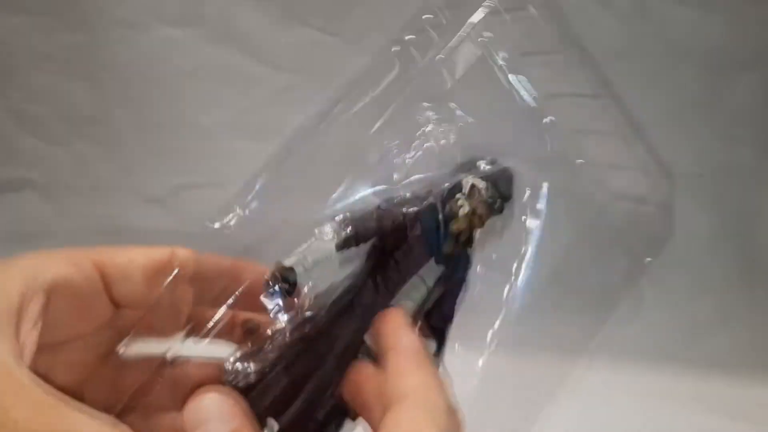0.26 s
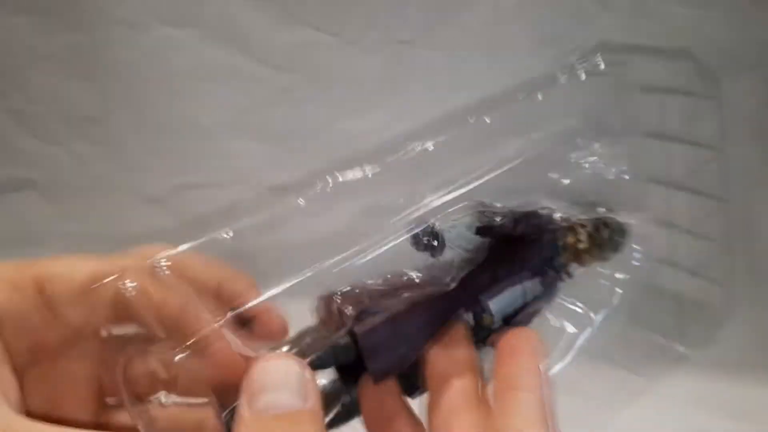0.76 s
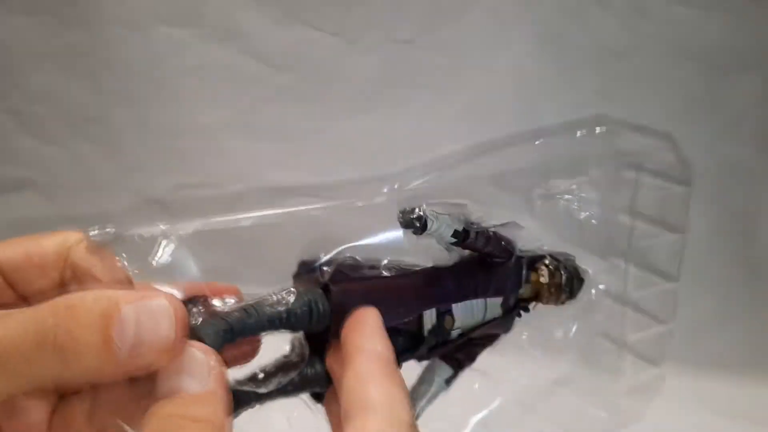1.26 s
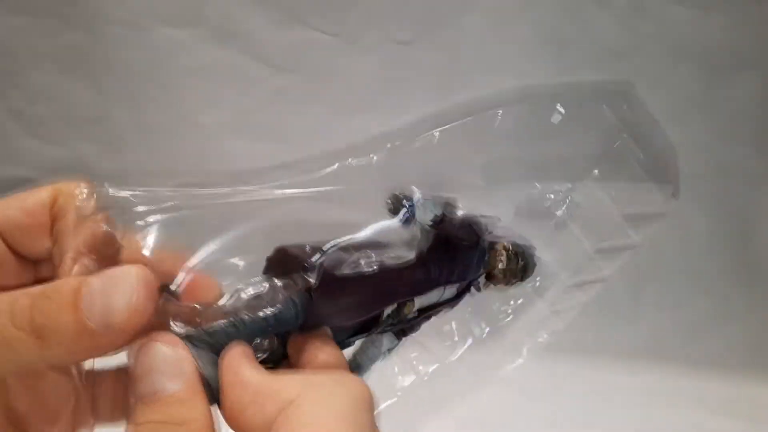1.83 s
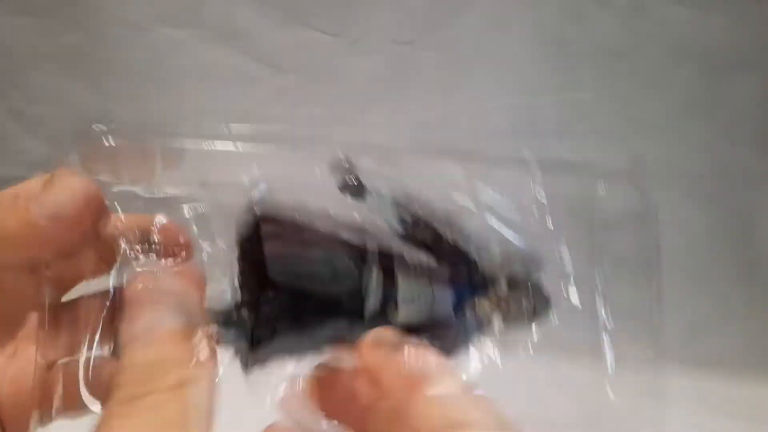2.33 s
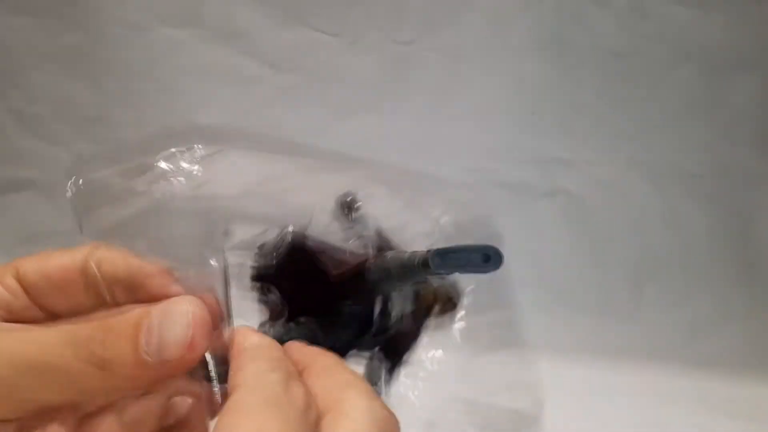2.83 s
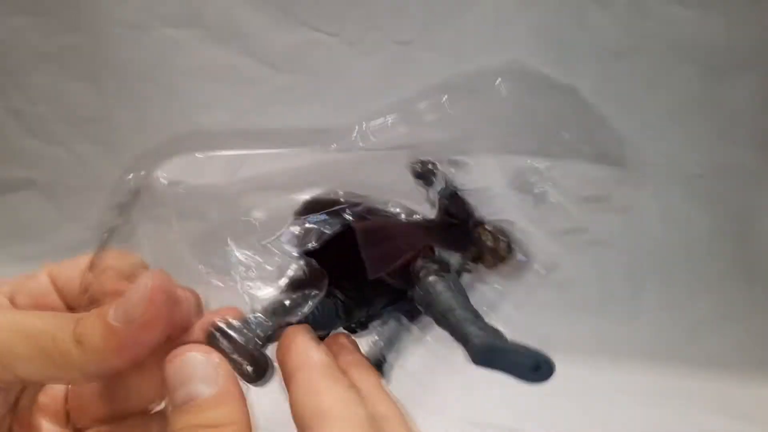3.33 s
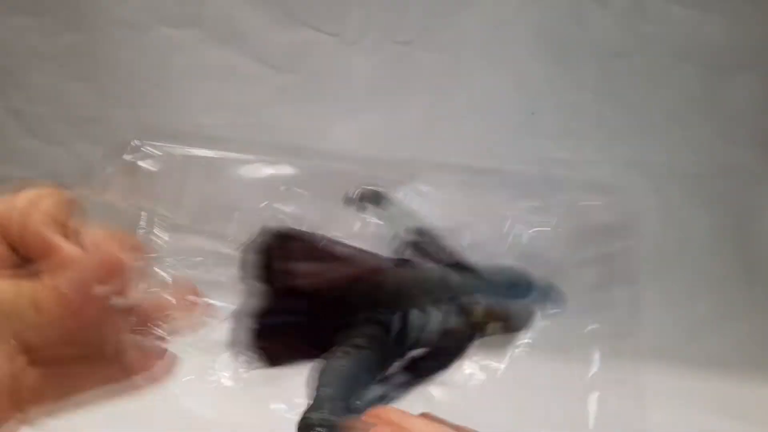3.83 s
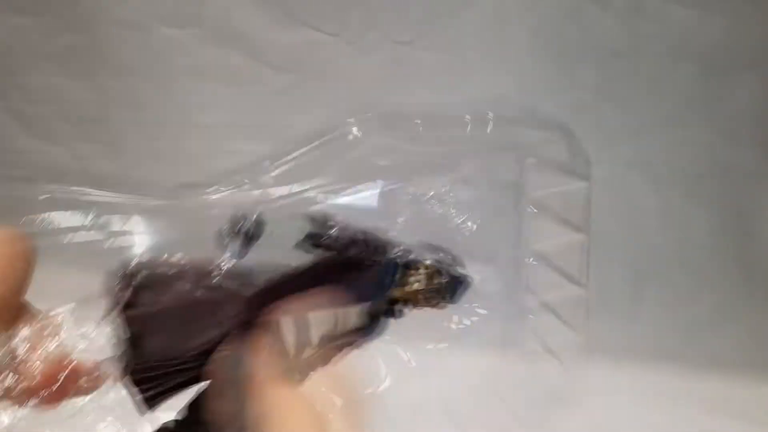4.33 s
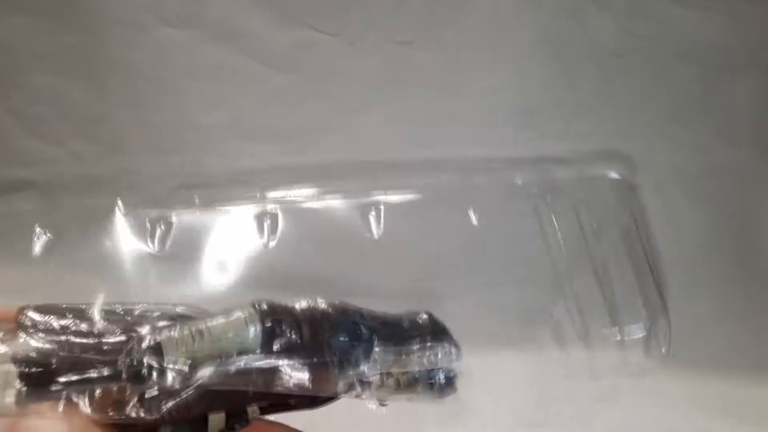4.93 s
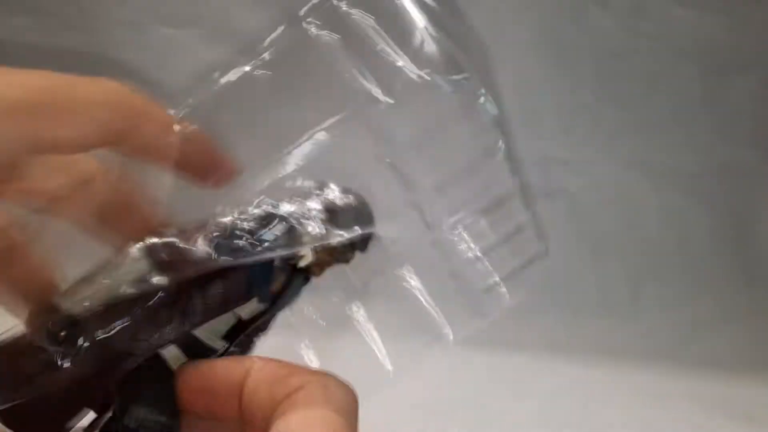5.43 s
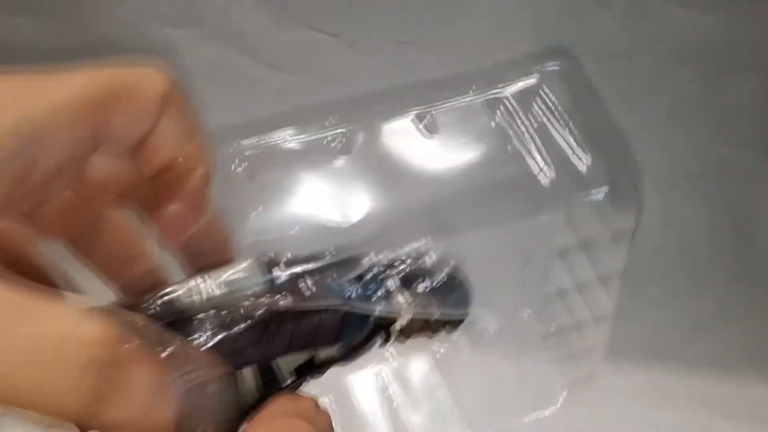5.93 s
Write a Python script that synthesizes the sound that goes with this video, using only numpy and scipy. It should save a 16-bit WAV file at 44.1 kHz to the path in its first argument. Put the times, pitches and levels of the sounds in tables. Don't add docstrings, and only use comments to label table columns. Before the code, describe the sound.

Close stereo sound in a small, dry, quiet room with barely audible room tone. At 0 s a thin stiff plastic tray buckles with loud bright snaps and a hollow knock, falling by 0.1 s to lighter pops, rubbing and crinkle until about 1 s. From 1.1 s ticks build into a dense burst at 1.25-1.5 s, with sharp cracks, short plastic pings and a low thump; another cluster hits at 1.8-2.0 s, then strong snaps at 2.25-2.4 s. From 2.5 to 3.05 s only faint ticks. Pressing brings heavy pops at 3.1-3.3 s, mixed snaps and a scrape near 3.5 s, more at 3.7-3.95 s. After a short hush, crisp snaps strike at 4.23-4.26 s and 4.48-4.53 s. Then it thins to small crackles and soft rubbing, a very quiet gap near 5.35 s, a moderate pop at 5.72 s and light crinkles to about 6.15 s.

```python
import sys
import numpy as np
from scipy import signal
from scipy.fft import rfft, irfft
from scipy.io import wavfile
from scipy.ndimage import uniform_filter1d

SR = 44100
rng = np.random.default_rng(int(sys.argv[2]) if len(sys.argv) > 2 else 0)


def voltage_ratio(level):
    return 10 ** (np.asarray(level, float) / 20)


def dump_mix(stems):
    frames = np.atleast_2d(stems).T
    limited = np.clip(frames, -1, 1)
    pcm = np.round(limited * 32767).astype(np.int16)
    wavfile.write(sys.argv[1], SR, pcm)


N = 272097

# start in seconds [s], knock level [dB].
POPS_LEGS = [(0.03, -10.5), (0.036, -37), (0.071, -26), (0.098, -19.5), (0.337, -15), (0.431, -19.5),
             (0.906, -26), (1.122, -20.5), (1.229, -22), (1.309, -31), (1.415, -12.5), (1.445, -16.5),
             (1.945, -20.5), (2.146, -23.5), (2.202, -17.5), (2.234, -32.5), (2.304, -20.5), (2.412, -33),
             (2.735, -31.5), (2.921, -37), (3.015, -34.5)]
# start in seconds [s], knock level [dB].
POPS_BODY = [(3.231, -7), (3.468, -16.5), (3.545, -30), (3.684, -25.5), (3.735, -17), (3.822, -21),
             (3.843, -15.5), (3.975, -26.5), (4.259, -28), (4.482, -16), (4.534, -13.5), (4.796, -28),
             (4.953, -27), (5.465, -28), (5.72, -23.5), (5.791, -20.5), (5.873, -51), (5.89, -50)]
LEFT_LEAD_S = 0.00017
MIDDLE_HZ = 1400


def evened(x):
    return x / np.sqrt(np.mean(x ** 2) + 1e-20)


def read(points, hz):
    f, value = np.transpose(points)
    return np.interp(np.log(hz + 1), np.log(f + 1), value)


def add(mix, s, sound):
    part = mix[:, round(s * SR):][:, :sound.shape[1]]
    part += sound[:, :part.shape[1]]


def band(x, lo_hz, hi_hz):
    return signal.sosfilt(signal.butter(N=2, Wn=[lo_hz, hi_hz], btype="band", fs=SR, output="sos"), x)


def ports(db):
    return voltage_ratio(np.array([[db], [-db]]))


def hush():
    # frequency [Hz], level [dB per Hz].
    tone = [(18, -25.5), (30, 10.5), (204, -6), (280, 11), (540, -28), (1590, -6.5), (2830, -43),
            (16000, -41)]
    white = rfft(rng.standard_normal((2, N)))
    shaped = white * voltage_ratio(read(tone, np.fft.rfftfreq(N, 1 / SR)))
    return voltage_ratio(-65.5) * evened(irfft(shaped, N))


def room(x):
    # frequency [Hz], decay time t60 [s].
    decay = [(200, 0.14), (2000, 0.12), (14000, 0.047)]
    taps = np.zeros((2, SR // 2))
    at = np.arange(200, SR // 2 - 20, 20) + rng.integers(0, 20, (2, 1))
    at = at + rng.integers(-9, 9, at.shape)
    np.put_along_axis(taps, at, rng.choice([-1., 1.], at.shape), 1)
    hz, t, z = signal.stft(taps, SR, nperseg=256)
    fade = voltage_ratio(-60 * t / read(decay, hz)[:, None])
    tail = signal.istft(z * fade, SR, nperseg=256)[1]
    return signal.fftconvolve(x, tail / np.linalg.norm(tail[0]), axes=1)[:, :N]


def spread(lo_hz, hi_hz, count=72):
    return lo_hz * (hi_hz / lo_hz) ** ((np.arange(count) + rng.random(count)) / count)


def patch(hz, db, tear_s, top_hz, count=72):
    # frequency [Hz], decay time t60 [s].
    sheet_decay = [(600, 0.054), (1500, 0.021), (4000, 0.014), (9000, 0.011), (16000, 0.0028)]
    # frequency [Hz], level [dB].
    radiation = [(600, -6.5), (800, -3), (2000, -4), (6000, 14), (9500, 14.5), (12500, 20.5), (16000, 20)]
    luck = rng.random((5, count))
    t = np.arange(2200) / SR
    t60 = read(sheet_decay, hz) * (0.83 + 0.59 * luck[0])
    modes = np.exp((2j * np.pi * hz - np.log(1000) / t60)[:, None] * t)

    lag = np.minimum(hz / 4500, 1) * (luck[3] - .5) - hz * LEFT_LEAD_S * (.5 + luck[0, 0])
    turn = luck[2] + np.array([0 * hz, lag])
    port_db = 3.9 * np.outer([1, -1], luck[4] - .5)
    size = voltage_ratio(db + read(radiation, hz) + 6.1 * (luck[1] - .5) + port_db)
    ringing = ((size * np.exp(2j * np.pi * turn)) @ modes).imag

    tear = rng.standard_normal(400) * np.exp(-(t[:400] / tear_s) ** 2)
    colour = rfft(tear)
    tear = irfft(colour / abs(colour) ** 0.45, len(tear))
    tear = tear * np.exp(-(t[:len(tear)] / tear_s) ** 2 / 2)
    out = signal.fftconvolve(ringing, tear[None], axes=1)
    out = band(out, 290, top_hz)
    return out / abs(out).max()


def dent(pitch_hz):
    # centre [Hz], width [octaves], level [dB].
    colouring = [(626, 0.13, -12.5), (876, 0.16, 3), (1052, 0.15, -4.5), (1750, 0.36, 4.5), (7700, 0.87, -5)]
    hz = spread(602.0, 7994)
    octaves = np.log2(hz / pitch_hz)
    colour_db = sum(db * np.exp(-(np.log2(hz / f) / wide) ** 2) for f, wide, db in colouring)
    slope_db = np.where(octaves > 0, 12.5, 8.0) * abs(octaves)
    return patch(hz, colour_db - slope_db, .001 + 1.2 / pitch_hz, min(3.5 * pitch_hz, SR / 2.2))


def crack():
    return patch(spread(5594, 15800), 0., 0.0016, SR / 2.2)


def knock():
    # mode frequency [Hz], level [dB], decay time t60 [s].
    tray = [(186.9, -15.5, 0.35), (277, -28, 0.14), (290.8, -7.5, 0.32), (320.9, 1.5, 0.17),
            (356.7, 8.5, 0.062), (427, 3.5, 0.053), (492.6, -2, 0.089)]
    t = np.arange(6000) / SR
    hz, db, t60 = np.transpose(tray)[:, :, None]
    bend, place = rng.standard_normal((2, len(tray), 1))
    fade = voltage_ratio(db + 2.5 * place - 60 * t / t60)
    ring = (fade * np.sin(2 * np.pi * hz * (1 + 0.04 * bend) * t)).sum(0)
    ring = band(ring * (1 - np.exp(-t / 0.0012)), 170, 990)
    return ring / abs(ring).max() * ports(.8)


def sparks(per_s, spread_db):
    return voltage_ratio(spread_db * np.minimum(rng.exponential(1, N), 4)) * (rng.random(N) < per_s / SR)


def crackle(shapes, per_s, spread_db):
    out = 0
    for shape in shapes:
        train = sparks(per_s / len(shapes), spread_db)
        out = out + signal.oaconvolve(train[None], shape, axes=1)[:, :N]
    return evened(out)


def stir(rows, column):
    strain_db, strain_s, settle_s = -15, 0.02, 0.024
    t = np.arange(0, N + 256, 256) / SR
    since = t - np.array([r[0] for r in rows])[:, None]
    before = voltage_ratio(strain_db) * np.exp(-abs(since) / strain_s)
    shape = np.where(since < 0, before, np.exp(-abs(since) / settle_s))
    power = voltage_ratio([r[column] for r in rows]) ** 2 @ shape
    return np.interp(np.arange(N) / SR, t, power)


def control(column, hand_db, unrest, unrest_db):
    # time in seconds [s], grip pressure [dB], finger slide [dB].
    grip = [(0, -45.5, -48), (.45, -55.5, -57.5), (.8, -51.5, -63), (1.3, -67, -53), (1.7, -55, -64.5),
            (2.3, -59.5, -65.5), (2.75, -63, -71), (3.3, -50, -48), (3.6, -72, -61), (3.947, -47, -42),
            (4.301, -78.5, -101.5), (4.751, -76, -69.5), (5.2, -55, -67), (5.5, -50, -62.5),
            (5.85, -47.5, -53.5), (6.15, -55.5, -60.5)]
    # middle in seconds [s], length [s], depth [dB].
    pauses = [
        (1.06, 0.17, -8.5),
        (2.52, 0.08, -11.5),
        (2.996, 0.16, -12.5),
        (3.44, 0.06, -7.5),
        (4.131, 0.066, -21),
        (4.426, 0.021, -3),
        (5.354, 0.18, -21.5),
        (5.637, 0.12, -11.5),
    ]
    rows, t = np.array(grip), np.arange(N) / SR
    hands = voltage_ratio(hand_db + np.interp(t, rows[:, 0], rows[:, column]))
    still_db = sum(db * np.exp(-(2 * (t - s) / long_s) ** 4) for s, long_s, db in pauses)
    return np.sqrt(hands ** 2 + voltage_ratio(unrest_db) ** 2 * unrest) * voltage_ratio(still_db)


def handling():
    # time in seconds [s], level [dB].
    bumps = [
        (1.42, -24),
        (3.1, -30.5),
        (3.79, -29.5),
        (4.5, -27.5),
    ]
    dull = crackle([dent(hz) for hz in spread(750, 2600, count=8)], 900, 3.8)
    fine = crackle([crack() + 1.15 * dent(hz) for hz in spread(2600, 6900, count=16)], 1600, 3.2)
    clumps = evened(uniform_filter1d(rng.standard_normal(N), size=900))
    fine = evened(fine * voltage_ratio(5.5 * clumps))
    creak = crackle([knock() for _ in range(6)], 90, 2.85)
    lumps = rng.standard_normal((3, N))
    thump = lumps[:2] * 0.32 + lumps[2]
    thump = evened(band(band(thump, 62, 208), 43, 210))

    bent, creased = stir(dents(), column=1), stir(dents(), column=3)
    popped = stir(POPS_LEGS + POPS_BODY, column=1)
    bumped = popped + voltage_ratio(43.5) * stir(bumps, column=1)
    rub = control(2, 5.5, bent, -37.5) * dull
    rub = rub + control(2, -0.18, creased, -25.0) * fine
    rub = rub + control(1, -1.7, bumped, -31.5) * thump
    return ports(1.3) * rub + control(1, 3.1, popped, -16.0) * creak


def rings(rows, t60, trim_db):
    out, t = np.zeros((2, N)), np.arange(6000) / SR
    late = t - np.array([[0], [LEFT_LEAD_S]])
    for s, db, hz in rows:
        pair = np.sin(2 * np.pi * hz * late) + 0.27 * np.sin(2 * np.pi * hz * 1.09 * late + 0.39)
        fade = voltage_ratio(db + trim_db - 60 * t / t60) * (1 - np.exp(-t / 0.00089))
        add(out, s, ports(1.4) * fade * pair)
    return out


def thuds():
    # start in seconds [s], level [dB], pitch [Hz].
    heel = [
        (0.198, -34, 113),
        (1.413, -29.5, 112),
        (1.938, -37.5, 140),
        (3.111, -27.5, 166),
        (3.788, -33, 60),
        (4.768, -42, 134.4),
        (5.779, -35.5, 161),
    ]
    return band(rings(heel, .16, -1.8), 35, 170)


def panels():
    # start in seconds [s], level [dB], pitch [Hz].
    low = [(0.019, -20, 940), (0.059, -9, 980), (0.231, -24.5, 837), (0.43, -22, 870), (0.62, -21.5, 870),
           (1.123, -22, 807), (1.232, -23.5, 770), (1.315, -22, 750), (1.414, -6.5, 690), (1.458, -27, 730),
           (1.485, -15, 767), (1.812, -22.5, 1284), (1.855, -35, 860), (1.922, -27.5, 1190),
           (1.945, -17.5, 1350), (1.972, -16, 650), (2.204, -31, 845), (2.261, -16, 765),
           (2.304, -19.5, 750), (2.375, -9.5, 940), (2.434, -29, 1134), (2.47, -29.5, 963),
           (2.554, -33.5, 984), (2.846, -28.5, 837), (3.081, -18, 956), (3.101, -19.5, 806),
           (3.159, -20, 940), (3.22, -10.5, 810), (3.286, -9.5, 884), (3.472, -11.5, 1113),
           (3.689, -22.5, 700), (3.767, -19, 810), (3.819, -21, 925), (3.915, -8, 1190),
           (4.243, -24.5, 860), (4.257, -13.5, 1140), (4.304, -28, 945), (4.338, -25, 670),
           (4.482, -10, 780), (4.517, -7.5, 1170), (4.868, -25, 1195), (4.916, -29, 1260),
           (6.118, -28.5, 767)]
    # start in seconds [s], level [dB], pitch [Hz].
    high = [(0.058, -23, 1450), (0.2075, -28, 1660), (0.4296, -19, 1730), (0.9662, -22, 1910),
            (1.2573, -11.5, 4420), (1.3493, -10, 4330), (1.3515, -2.5, 1870), (1.3743, 1.5, 1785),
            (1.484, -5.5, 1810), (1.7277, -19, 1810), (1.8128, -2.5, 1667), (1.925, -17, 1550),
            (1.947, 2, 2100), (2.0762, -24, 4450), (2.2618, -5, 2100), (2.304, -17, 1590),
            (2.359, -23.5, 1750), (2.3695, 3, 2180), (2.5547, -24.5, 1620), (2.6315, -24, 1395),
            (3.1068, -17.5, 1420), (3.2224, -8.5, 1650), (3.2874, -20.5, 1720), (3.475, -25, 1364),
            (3.4735, -0.5, 2000), (3.5813, -16, 4320), (3.6855, -28.5, 2020), (3.7494, -29, 2080),
            (3.7674, -8.5, 1570), (3.8176, -31, 1480), (3.9125, -6, 2300), (4.213, -35.5, 3670),
            (4.2298, 2, 3150), (4.2564, -25, 1660), (4.4453, -26.5, 1400), (4.4802, 3, 2110),
            (4.5155, -20.5, 1730), (4.953, -19, 1420), (5.72, -16, 1967), (6.116, -17.5, 2270)]
    return rings(low, 0.031, -2.5) + rings(high, 0.015, -3.0)


def slips():
    # start in seconds [s], dent level [dB], patch pitch [Hz], crease tick level [dB].
    small_dents = [(0.2404, -32.5, 1380, -47), (0.2734, -28, 1360, -51), (0.3864, -35, 1470, -43),
                   (0.4074, -26, 1530, -34), (0.5087, -35, 1490, -52), (0.7344, -27, 1820, -35),
                   (0.8804, -33.5, 1390, -41), (1.3484, -20, 1860, -15), (1.4074, -13, 1610, -28),
                   (1.4514, -20, 1310, -28), (1.5224, -33, 1740, -33.5), (2.0874, -33, 2150, -54),
                   (2.1804, -23.5, 2060, -43), (2.5854, -42, 1630, -60), (2.8124, -32, 3770, -32),
                   (2.9452, -40, 3260, -52.5), (3.0624, -37, 4080, -34), (3.0714, -35, 1320, -21.5),
                   (3.5264, -45, 3740, -33.5), (3.6364, -29, 1500, -49), (3.7344, -37, 1340, -46),
                   (3.8344, -14, 1980, -31), (3.9364, -34, 1664, -26), (4.1994, -37.5, 3410, -49),
                   (4.3844, -33, 1350, -60), (4.7424, -44, 1720, -59), (5.7004, -38, 1900, -55),
                   (5.891, -36, 1390, -44), (5.9938, -41, 1400, -53), (6.0904, -40, 1280, -54),
                   (1.139, -33, 4500, -43), (1.217, -27, 4050, -33), (1.234, -28, 3500, -24),
                   (4.294, -31, 3510, -37), (4.442, -36, 3470, -37), (5.908, -46, 4490, -36),
                   (1.74, -39, 4000, -40), (1.785, -50, 4000, -50), (1.871, -33, 3500, -33),
                   (3.179, -39, 4480, -30.5)]
    out = np.zeros((2, N))
    for s, dent_db, pitch_hz, crack_db in small_dents:
        add(out, s - .0005, voltage_ratio(dent_db - 3.5) * dent(pitch_hz) + voltage_ratio(crack_db + 2.5) * crack())
    return out * ports(1.4)


def scrapes():
    # start in seconds [s], length [s], dent level [dB], patch pitch [Hz].
    slides = [(0, 0.01, -62.5, 1610), (0.33, 0.034, -30.5, 1060), (0.543, 0.029, -44, 1680),
              (0.608, 0.06, -39.5, 1280), (0.713, 0.082, -43, 1570), (1.304, 0.013, -32, 953),
              (1.344, 0.0068, -41, 2266), (1.403, .022, -29, 1190), (1.889, 0.089, -38.5, 1770),
              (2.341, 0.054, -27, 1505), (3.055, 0.049, -35, 1565), (3.093, 0.026, -25.5, 1220),
              (3.459, 0.0355, -24, 875), (3.684, 0.018, -31, 1390), (4.436, 0.029, -37.5, 1583),
              (4.532, 0.045, -35, 1290), (5.138, .085, -51, 1260), (5.392, 0.079, -58.5, 1580),
              (5.446, 0.077, -49.5, 1060), (5.529, 0.045, -47.5, 1760)]
    out = np.zeros((2, N))
    for s, long_s, dent_db, pitch_hz in slides:
        octaves = np.log2(pitch_hz / MIDDLE_HZ)
        knock_db = dent_db - 2.5 - 14 * octaves
        crack_db = dent_db - 10.5 + 25 * octaves
        swell = signal.windows.tukey(round(long_s * SR), .6)
        long = len(swell)
        parts = [(dent_db, dent(pitch_hz * .8)), (dent_db, dent(pitch_hz * 1.3)),
                 (crack_db, crack()), (knock_db, knock())]
        for db, shape in parts:
            push = swell * rng.standard_normal(long) * (rng.random(long) < .03)
            run = signal.fftconvolve(shape, push[None], axes=1)
            add(out, s, voltage_ratio(db - 3.0) * run / np.sqrt(np.mean(run[:, :long] ** 2)))
    return out * ports(1.2)


def dents():
    # start in seconds [s], dent level [dB], patch pitch [Hz], crease
    # tick level [dB].
    large_dents = [(.001, -6, 2560, -20.5), (.018, -13, 1190, -46.5), (.031, -21, 1790, -23.5),
                   (.038, -15.5, 2630, -19), (.06, -12.5, 1580, -22.5), (.072, -8.5, 2180, -18.5),
                   (.207, -20.5, 1620, -36.5), (.231, -26, 1840, -24), (.25, -38, 2210, -39),
                   (.301, -28, 1730, -33), (.347, -26.5, 1200, -59), (.397, -29.5, 3470, -39),
                   (.431, -23.5, 1420, -55.5), (.443, -23.5, 1090, -27), (.532, -29.5, 1710, -54),
                   (.556, -29.5, 2170, -36), (.795, -24.5, 1310, -52), (.837, -39, 2030, -43.5),
                   (.89, -62, 1150, -50), (.915, -33.5, 890, -51), (.966, -30.5, 1970, -34),
                   (1.002, -39, 830, -63), (1.031, -44, 2380, -35.5),
                   (1.123, -37, 745, -64), (1.145, -33, 1840, -35), (1.185, -32.5, 2210, -30),
                 (1.203, -41, 2260, -34), (1.225, -23.5, 3060, -23.5), (1.241, -22, 2960, -24),
                 (1.258, -10.5, 2970, -17), (1.274, -27.5, 3900, -30.5), (1.342, -9.5, 6470, -19.5),
                 (1.355, -21.5, 2650, -34.5), (1.374, -9.5, 2110, -17), (1.391, -11.5, 2730, -12.5),
                 (1.416, -9, 1500, -43), (1.461, -14.5, 1500, -35.5), (1.486, -13, 1200, -30.5),
                 (1.576, -30.5, 1930, -41), (1.606, -29.5, 1860, -41.5), (1.728, -35, 1850, -61.5),
                 (1.77, -38, 1730, -72), (1.813, -14.5, 2130, -36), (1.856, -23, 1910, -28),
                 (1.924, -12, 2210, -11), (1.947, -8, 2320, -12), (1.965, -8.5, 3300, -14.5),
                 (1.975, -20.5, 1670, -41),
                   (2.077, -23, 3910, -42), (2.133, -28.5, 1720, -39), (2.147, -27.5, 1660, -42),
                  (2.204, -26, 1250, -47), (2.217, -23.5, 1600, -50), (2.225, -25.5, 1960, -37.5),
                  (2.235, -23.5, 1520, -39), (2.245, -24, 1990, -34), (2.262, -10, 2870, -13),
                  (2.304, -12.5, 2520, -21), (2.357, -25, 2080, -19.5), (2.37, -8, 2100, -30.5),
                  (2.411, -26, 3100, -24.5), (2.435, -28.5, 1800, -33.5), (2.47, -31, 1410, -70),
                  (2.554, -37, 1440, -53.5), (2.633, -33, 1345, -57), (2.733, -35.5, 1840, -42),
                  (2.77, -36, 2140, -46), (2.785, -48, 2850, -42.5), (2.802, -35.5, 3550, -34.5),
                  (2.847, -34.5, 1630, -39), (2.92, -41.5, 2080, -65.5), (2.98, -44.5, 2490, -43.5),
                  (3.012, -39.5, 1440, -49), (3.044, -37.5, 1940, -42.5),
                   (3.081, -22.5, 1160, -21.5), (3.105, -15.5, 1670, -19), (3.16, -16, 2150, -31.5),
                (3.172, -27, 2360, -45), (3.207, -30.5, 3440, -30), (3.221, -7, 2930, -14),
                (3.233, -10, 1990, -9.5), (3.287, -6, 1770, -32.5), (3.304, -22, 3520, -17.5),
                (3.399, -32, 1800, -65), (3.441, -40, 4590, -31.5), (3.474, -16, 1380, -36.5),
                (3.534, -28, 2050, -24.5), (3.545, -27, 3580, -31), (3.559, -28, 1660, -54),
                (3.581, -19.5, 4600, -33.5), (3.595, -28, 4770, -26), (3.653, -26.5, 1800, -28.5),
                (3.684, -18.5, 1880, -32.5), (3.748, -26, 1520, -65), (3.77, -15, 2050, -16.5),
                (3.779, -16, 1950, -19), (3.789, -13, 3400, -16.5), (3.818, -12.5, 1380, -37),
                (3.843, -21, 2190, -19), (3.915, -9, 1860, -27.5), (3.922, -6, 2150, -23),
                (3.989, -51, 1320, -47), (4.013, -32.5, 2600, -30), (4.024, -21.5, 1750, -32.5),
                   (4.045, -34, 2980, -49.5), (4.076, -33.5, 2160, -41), (4.153, -39, 2020, -35),
               (4.214, -46, 3250, -39.5), (4.23, -8, 3750, -19.5), (4.258, -7.5, 1400, -29),
               (4.304, -26, 1610, -29.5), (4.338, -30, 1030, -36.5), (4.354, -29.5, 1670, -38),
               (4.455, -26, 2020, -25.5), (4.474, -17.5, 3270, -24), (4.483, -7, 1500, -21),
               (4.516, -7, 2110, -22.5), (4.527, -12, 3300, -28), (4.532, -12, 1470, -15),
               (4.667, -36, 3870, -38.5), (4.758, -33.5, 2010, -29.5), (4.765, -57, 2700, -39),
               (4.798, -33.5, 1670, -53.5), (4.868, -31.5, 1470, -35.5), (4.916, -24, 1720, -36.5),
               (4.954, -23.5, 1800, -33.5), (5.027, -35, 3300, -40.5), (5.069, -41, 1635, -49.5),
               (5.167, -28, 2260, -33),
                   (5.402, -38, 1790, -57), (5.465, -30.5, 1316, -37.5), (5.501, -36, 1420, -63),
                (5.578, -40, 2680, -42), (5.653, -32.5, 3500, -41), (5.721, -16, 1910, -26),
                (5.782, -40, 2540, -37.5), (5.794, -24, 1270, -59.5), (5.85, -29.5, 4250, -33),
                (5.875, -30, 1410, -42), (5.96, -33, 1430, -58.5), (6.035, -32, 840, -48),
                (6.109, -28.5, 2200, -53), (6.118, -21.5, 1740, -36), (6.152, -25.5, 1320, -41.5)]
    return large_dents


def snaps():
    out = np.zeros((2, N))
    for s, dent_db, pitch_hz, crack_db in dents():
        snap = voltage_ratio(dent_db + 3.5) * dent(pitch_hz) + voltage_ratio(crack_db + 7.0) * crack()
        add(out, s - .0005, ports(1.4) * snap)
        knock_db = dent_db - 11.5 - 11 * np.log2(pitch_hz / MIDDLE_HZ)
        add(out, s, voltage_ratio(knock_db) * knock())
    for s, knock_db in POPS_LEGS + POPS_BODY:
        add(out, s, voltage_ratio(knock_db - 6.0) * knock())
    return out


def scene():
    # time in seconds [s], left minus right [dB].
    work_place = [(0.0, 2.5), (0.31, 3.0), (2.01, 1.5), (2.29, 3.5), (2.54, 1.5), (2.73, 3), (2.92, -1.5),
                  (3.06, 5), (3.2, 1), (4.33, 4), (5.741, 4.5), (6.17, 3)]
    rows = np.array(work_place)
    lean_db = np.interp(np.arange(N) / SR, rows[:, 0], rows[:, 1]) - 3
    lean = voltage_ratio(np.outer([.5, -.5], lean_db))
    hits = lean * (snaps() + scrapes() + handling())
    small = lean * (slips() + panels() + thuds())
    return hits + voltage_ratio(-13.5) * room(hits) + small + voltage_ratio(-16.0) * room(small) + hush()


def band_limit(x):
    return signal.sosfilt(signal.butter(12, 16400, fs=SR, output="sos"), x)


def record(dry):
    held = np.clip(dry, -1, 1)
    below = signal.oaconvolve(held, signal.firwin(255, 15900, fs=SR)[None], "same")
    return band_limit(below + voltage_ratio(-16.0) * (held - below))


dry = scene()
out = record(dry)
dump_mix(out)
```